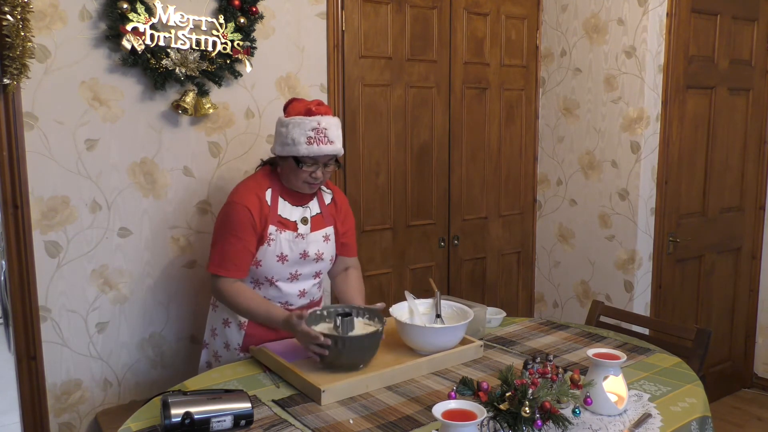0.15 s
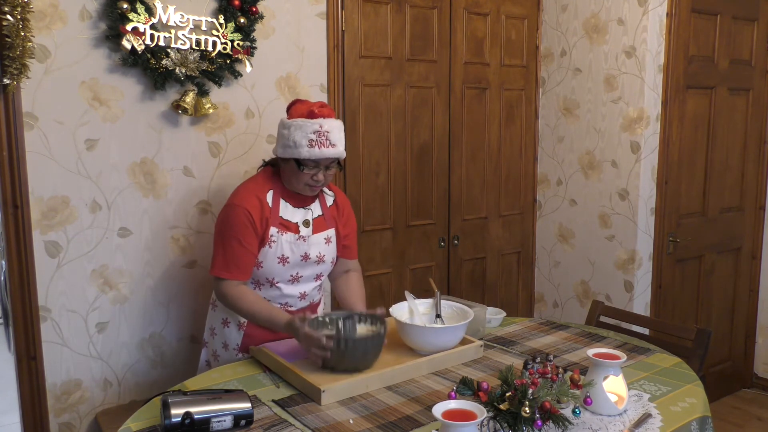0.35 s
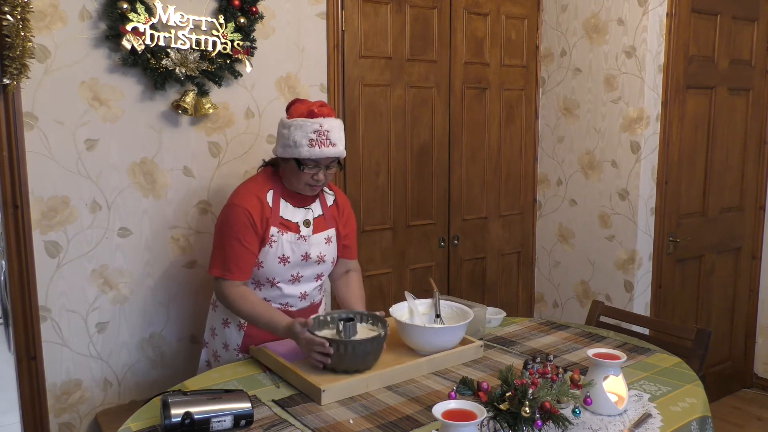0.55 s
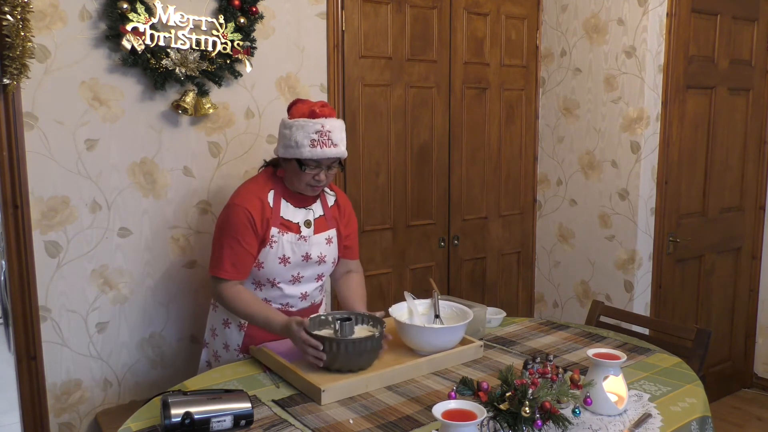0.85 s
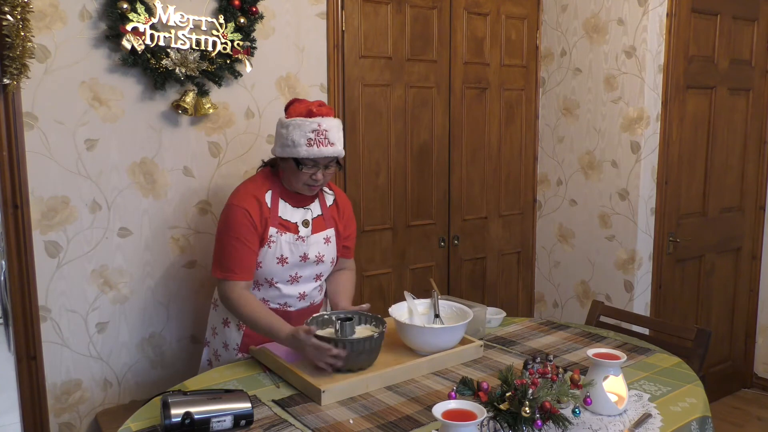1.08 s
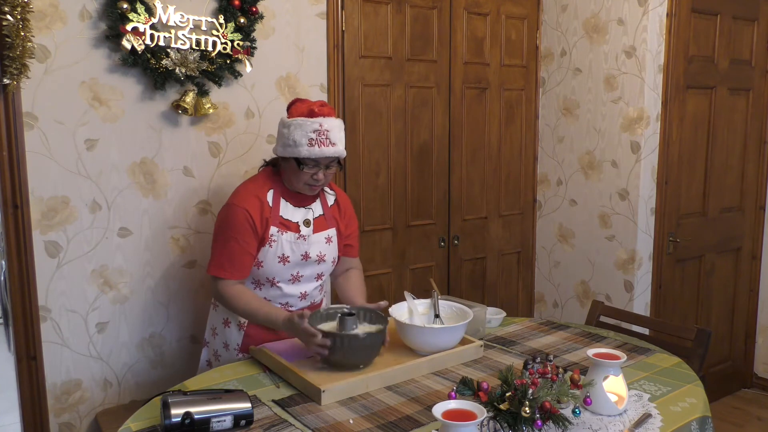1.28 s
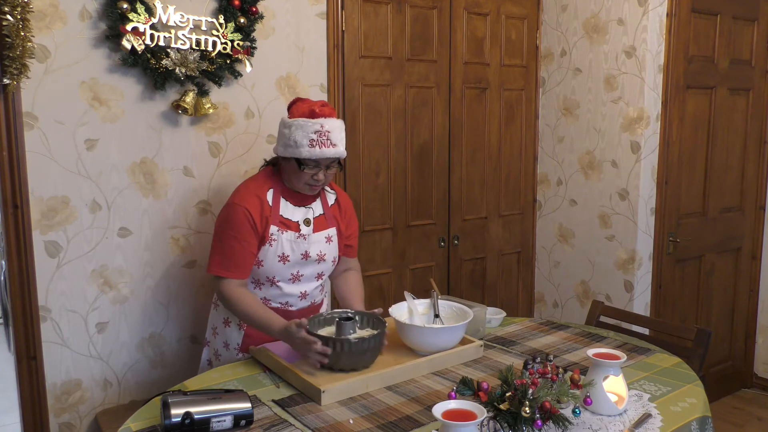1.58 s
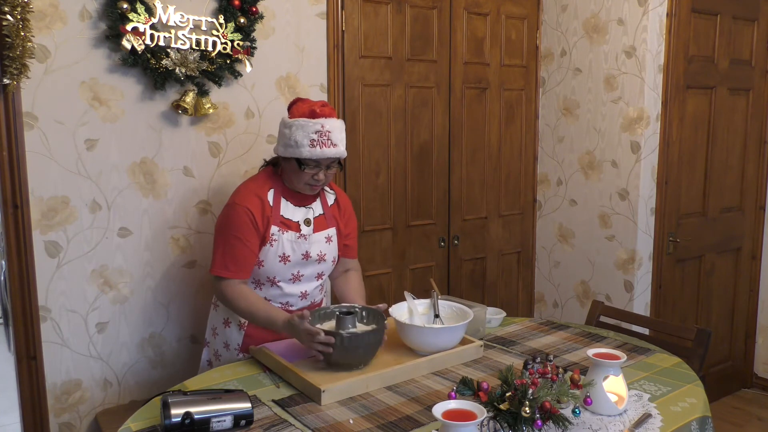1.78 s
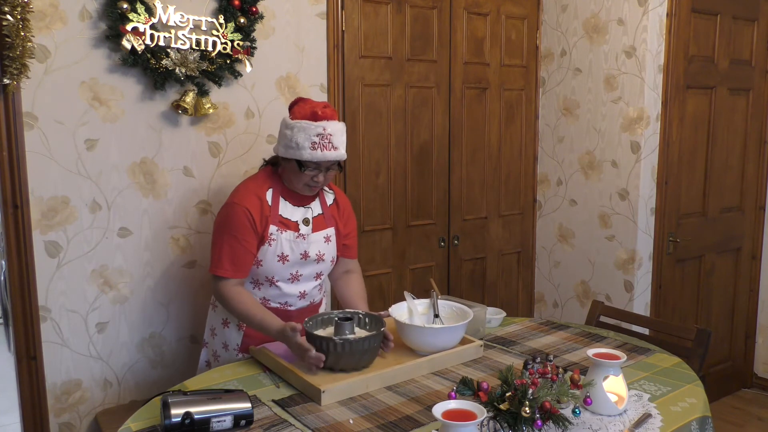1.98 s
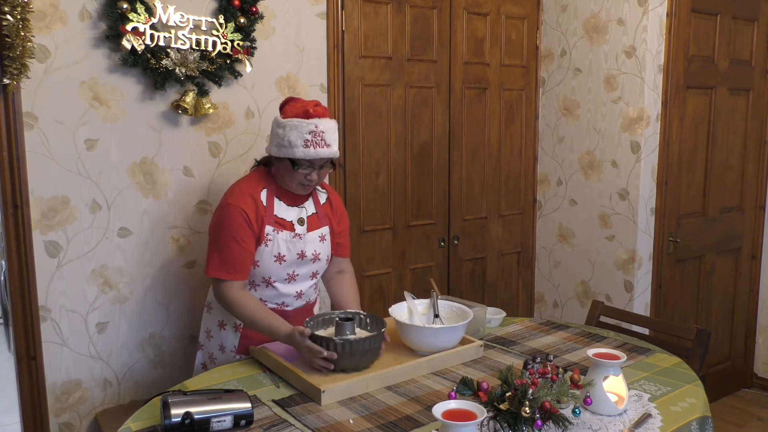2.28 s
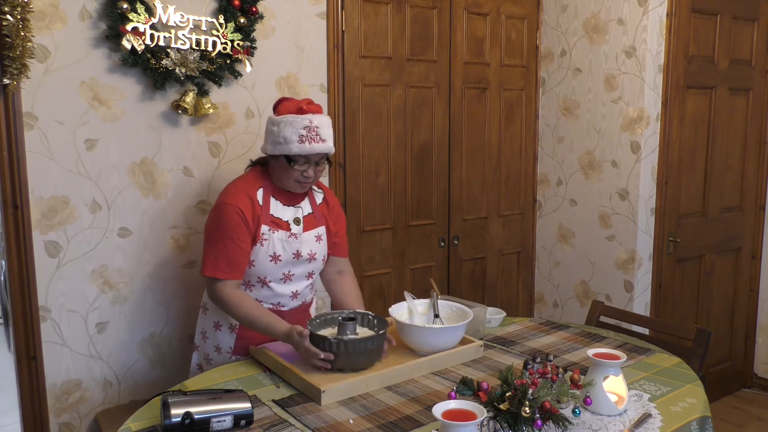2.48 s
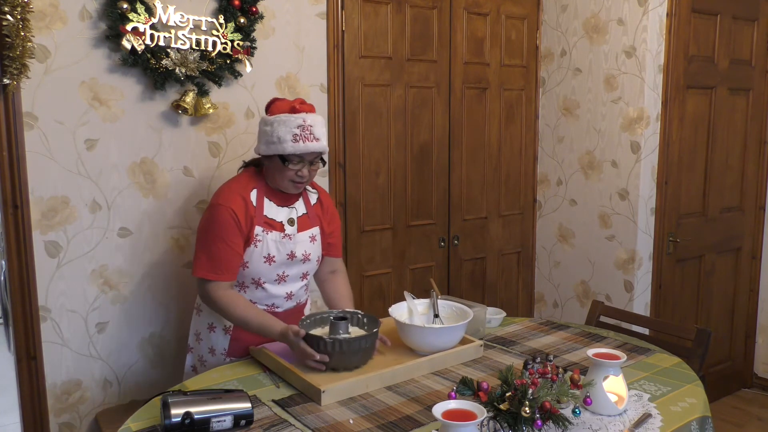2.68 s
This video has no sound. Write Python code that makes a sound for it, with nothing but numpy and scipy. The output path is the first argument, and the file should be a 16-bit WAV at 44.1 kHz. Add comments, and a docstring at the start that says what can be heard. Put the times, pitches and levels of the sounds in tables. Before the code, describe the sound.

Four loud clanking thuds of a filled baking pan on wood, then a gentle set-down

```python
"""A close stereo pair in a small live room: room tone, and hands scuffing on a metal cake pan full of batter.
The pan is knocked down four times on a wooden board, with lighter touches and more scuffs in between.
Each knock is a clank of the rim, a dull thud of board modes and a short wavering ring, under noise reverberation.
Then the pan slides in short strokes of tiny slips and is set down gently, rim first; a last scuff follows.
A limiter flattens each hard knock, then lets the room swell back."""
import sys
import numpy as np
from scipy import signal
from scipy.fft import rfft, irfft
from scipy.io import wavfile
from scipy.ndimage import uniform_filter1d, minimum_filter1d, map_coordinates

SR = 44100
rng = np.random.default_rng(int(sys.argv[2]) if len(sys.argv) > 2 else 0)


def file_out(sig):
    """Save sig as 16-bit WAV at sys.argv[1]."""
    # one column per channel
    cols = np.atleast_2d(sig).T
    # limit, then scale
    lim = np.clip(cols, -1, 1)
    pcm = np.round(lim * 32767).astype(np.int16)
    wavfile.write(sys.argv[1], SR, pcm)


N = 125685

# Pan meets board. Each row: start in seconds, force in dB, hardness in dB per octave (well above a corner),
# pan ring in dB, ring length as a ratio, room in dB, tuning of the thud as a ratio, lower pitch favoured
# by the spot struck in Hz, its lift in dB, upper favoured pitch in Hz, its lift in dB, clank of the rim in Hz.
KNOCKS = [(0.3186, 5.5, 0.6, -1, 1, -1.5, 0.97, 341, 4, 690, 0.5, 2515),
          (0.6913, 8, -0.33, 1, 0.92, -2, 1.028, 421, 1.5, 630, 4.5, 2340),
          (1.051, -29, -7.5, 9, 0.32, -3, 1.0, 197, 17.5, 440, -4, 1490),
          (1.072, -32.5, -16, -12, .6, -4, 0.93, 199, 8, 436, 10.5, 1490),
          (1.095, -34.5, -12.5, 4, .5, -3.5, 1.0, 187, 12, 244, 7, 1500),
          (1.2656, 6.5, 1.5, 2, 0.85, -4, 1.015, 238, 4, 445, 3, 1466),
          (1.587, -31, -11, 5, 0.8, 3.5, 0.89, 445, 7.5, 660, 4, 1550),
          (1.7880, 4, 0.27, 2, 0.88, -3, 0.99, 176, 5, 263, 0, 1544),
          (2.4753, -17.5, -6, -2.5, 0.9, -0.5, 1.03, 178, 7, 720, 5, 900),
          (2.509, -24, -14, 13, 0.27, 4.5, 0.85, 198, 10, 413, 15.5, 1010),
          (2.564, -25.5, -6, -9, .5, 8.5, 1.08, 267, 9, 740, 3, 1390),
          (2.5748, -9.5, -4.5, 2, 0.79, 0.5, 1.087, 177, 5.5, 1060, 9.5, 1250)]
# Lean of the stereo pair. Each row: frequency in Hz, dB added at the left and taken off at the right
# (the direct sound takes half).
LEAN_LEFT = [(30, 2.5), (100, 0.5), (300, 0.5), (700, -0.5), (2000, -0.35), (5000, 0.7), (16000, 0.3)]


def amp(db):
    """Decibels to gain."""
    return 10 ** (np.asarray(db) / 20)


def unit(x):
    """Scales to rms 1."""
    return x / np.sqrt(np.mean(x ** 2) + 1e-20)


def read(points, hz):
    """Reads a table on a log-frequency axis."""
    f, value = np.transpose(points)
    return np.interp(np.log(hz + 1), np.log(f + 1), value)


def add(mix, s, sound):
    """Adds a sound at time s in seconds."""
    part = mix[:, max(round(s * SR), 0):][:, :sound.shape[-1]]
    part += sound[..., :part.shape[1]]


def butter(x, hz, kind, order):
    """A plain low-pass or high-pass."""
    return signal.sosfilt(signal.butter(order, min(hz, SR / 2 - 1), kind, fs=SR, output="sos"), x)


def colour(x, curve, size=4096):
    """Causal minimum-phase filter whose gain in dB is curve(hz)."""
    cepstrum = irfft(np.log(amp(curve(np.fft.rfftfreq(size, 1 / SR)))))
    # folding the cepstrum forward in time makes the filter causal
    cepstrum[1:size // 2] *= 2
    cepstrum[size // 2 + 1:] = 0
    taps = irfft(np.exp(rfft(cepstrum)))[:size // 2]
    return signal.fftconvolve(np.atleast_2d(x), taps[None], axes=1)[:, :x.shape[-1]]


def favour(hz, centre_hz, lift_db):
    """A resonant hump in dB around one pitch."""
    width_octaves = 0.11
    return lift_db * np.exp(-(np.log2((hz + 1) / centre_hz) / width_octaves) ** 2)


def diffuse(spectrum, count):
    """Noise arriving from all sides; how alike the two microphones hear it depends on frequency."""
    # Each row: frequency in Hz, left-right correlation.
    likeness = [(30, 0.51), (70, -0.16), (150, 0.25), (300, 0.33), (550, 0.37), (1000, 0.45), (2500, 0.34),
                (6000, 0.3), (16000, -0.58)]
    hz = np.fft.rfftfreq(count, 1 / SR)
    mid, side = rfft(rng.standard_normal((2, count)))
    same = np.clip(read(likeness, hz), -1, 1)
    lean = read(LEAN_LEFT, hz)
    mid = mid * np.sqrt((1 + same) / 2)
    side = side * np.sqrt((1 - same) / 2)
    pair = np.array([mid + side, mid - side]) * amp([lean, -lean])
    return irfft(pair * amp(read(spectrum, hz)), count)


def room(spectrum):
    """One second of reverberation, each band dying at its own speed after a short build-up."""
    # Each row: frequency in Hz, time to fall 60 dB in seconds.
    room_t60 = [(60, 0.38), (250, 0.41), (700, 0.42), (2000, 0.46), (5000, 0.37), (12000, 0.23)]
    rise_s = 0.0058
    hz, t, bands = signal.stft(diffuse(spectrum, SR), SR, nperseg=256)
    decay = amp(-60 * t / read(room_t60, hz)[:, None])
    tail = signal.istft(bands * decay, SR, nperseg=256)[1][:, :SR]
    return tail * (1 - np.exp(-(np.arange(SR) / SR / rise_s) ** 2))


def with_echo(dry, wet_db):
    """A small sound together with its reverberation."""
    tail = room([(20, 0), (16000, 0)])  # flat spectrum
    wet = signal.fftconvolve(dry, tail / np.linalg.norm(tail[0]), axes=1)[:, :N]
    return dry + amp(wet_db) * wet


def room_tone():
    """The quiet room: steady diffuse noise, strongest in the bass."""
    # Each row: frequency in Hz, relative level in dB.
    floor_colour = [(12, -31), (20, 2), (49, -5), (107, -12), (134, -8.5), (277, -11.5), (624, -23),
                    (1030, -23.5), (1710, -30.5), (8180, -40.5), (16000, -47.5)]
    level_db = -43
    return amp(level_db) * unit(diffuse(floor_colour, N))


def scuffs():
    """Grainy rubbing of hands and pan: noise with a restless level, and its echo."""
    # Each row: start in seconds, rise in seconds, fade time constant in seconds, level in dB.
    rubs = [(.015, 0.019, 0.03, -54), (.08, 0.06, 0.025, -53.5), (0.27, 0.0086, 0.052, -54),
            (0.395, 0.0016, 0.011, -28), (1.039, 0.0084, 0.012, -33), (1.556, 0.018, 0.061, -52),
            (2.12, 0.047, 0.038, -55), (2.2, 0.27, 0.69, -52), (2.731, .01, 0.027, -43),
            (2.79, 0.078, 0.13, -50)]
    # Each row: frequency in Hz, relative level in dB.
    rub_colour = [(200, -50), (1200, -4), (2300, 2.5), (4500, 2), (7500, -4.5), (10000, -14), (16000, -37)]
    grain_db, wet_db = 2.3, -4
    t, level = np.arange(N) / SR, np.zeros(N)
    for s, rise, fade, db in rubs:
        swell = np.clip((t - s) / rise, 0, 1)
        level += amp(db) * swell * np.exp(-np.maximum(t - s - rise, 0) / fade)
    wander = unit(uniform_filter1d(rng.standard_normal(N), size=90))
    grain = unit(amp(grain_db * wander))
    dry = level * grain * unit(diffuse(rub_colour, N))
    return with_echo(dry, wet_db)


def mode(hz, db, t60, t, phase=0):
    """One dying vibration."""
    return amp(db) * np.exp(-np.log(1000) * t / t60) * np.sin(2 * np.pi * hz * t + phase)


def rim_chatter(t):
    """The rim chatters on the wood: a short coloured burst of noise."""
    # Each row: frequency in Hz, gain in dB.
    chatter_colour = [(30, -19.5), (200, 16), (1500, 8.5), (2600, -8), (2950, 3), (3400, 0.5),
                      (4500, -11.5), (6000, -13), (9000, -26.5), (16000, -23)]
    level_db, rise_s, fade_s = -1.5, 0.0016, 0.0035
    chatter = rng.standard_normal(len(t)) * np.exp(-t / fade_s) * (1 - np.exp(-t / rise_s))
    return amp(level_db) * colour(chatter, lambda hz: read(chatter_colour, hz))[0]


def board(tuning, t):
    """Board and table under the loaded pan: low modes start with the push, high ones depend on the spot struck."""
    # Each row: frequency in Hz before tuning, level in dB, time to fall 60 dB in seconds.
    board_modes = [(129, -12.5, 0.0056), (188, -12, 0.066), (236.6, -7.5, 0.11), (355.5, 2.5, 0.028),
                   (435, -7, 0.04), (654.3, -2, 0.049), (754.6, -7.5, 0.078), (1006, -16, 0.059),
                   (1263, -7.5, 0.022), (1426, -5.5, 0.015), (1950, -8.5, 0.014), (2340, -7.5, 0.014),
                   (3310, -28.5, 0.031), (4414, -19, 0.024), (5340, -15.5, 0.0062)]
    scatter_hz = 1354  # starting phases grow random toward this pitch and beyond
    return sum(mode(hz * tuning, db, t60, t, rng.standard_normal() * (hz / scatter_hz) ** 2)
               for hz, db, t60 in board_modes)


def pan_ring(ring_db, ring_length, t, count=64):
    """The sloshing batter makes each mode waver in level and pitch, so the ring dies unevenly."""
    # Pan and what it stands on. Each row: frequency in Hz before a slight random detuning,
    # level in dB before ring_db, time to fall 60 dB in seconds before ring_length.
    ring_modes = [(181.3, -17, 0.4), (220.5, -21.5, 0.49), (255.2, -19, 0.53), (363.6, -21.5, 0.42),
                  (440.5, -18, 0.47), (429, -15, 0.31), (572, -28.5, 0.4), (652, -22.5, 0.69),
                  (712, -15.5, 0.39), (761, -20.5, 0.38), (826, -24.5, 0.53), (942, -28.5, 0.56),
                  (1190, -24.5, 0.31), (1337, -35.5, 0.51), (1955, -34.5, 0.49)]
    rise_s, detune_ratio = 0.0027, 0.0025
    slosh_hz, slosh_depth = 21.2, 0.47  # how fast and how deeply the batter unsettles the ring
    out = np.zeros((2, len(t)))
    for hz, db, t60 in ring_modes:
        knots = rng.standard_normal(count) + 1j * rng.standard_normal(count)
        waver = 1 + slosh_depth * np.interp(t * slosh_hz, np.arange(count), knots)
        # each microphone hears the mode at a slightly different phase
        phase = rng.uniform(0, 2 * np.pi) + 0.35 * rng.standard_normal((2, 1)) + np.angle(waver)
        pitch_hz = hz * (1 + detune_ratio * rng.standard_normal())
        out += abs(waver) * mode(pitch_hz, db + ring_db, t60 * ring_length, t, phase)
    return out * (1 - np.exp(-t / rise_s))


def ears(x):
    """The sound reaches the left microphone a moment early, and with a little more bass."""
    lead_s = 0.000035
    late = map_coordinates(x, [np.arange(len(x)) - lead_s * SR], order=3)
    left = colour(x, lambda hz: read(LEAN_LEFT, hz) / 2)
    right = colour(late, lambda hz: -read(LEAN_LEFT, hz) / 2)
    return np.vstack([left, right])


def knock(force_db, hardness_db, ring_db, ring_length, room_db, tuning, low_hz, low_db, high_hz, high_db, clank_hz):
    """The rim chatters and clanks on the wood, the board thuds, the pan rings and the room answers."""
    # First reflections at each microphone. Each row: delay in seconds, gain as a ratio.
    echoes_left = [(.0032, 0.15), (.0077, 0.22), (.0152, .15), (.0275, .14)]
    echoes_right = [(.0032, .2), (.0077, .42), (0.0159, .1), (0.0212, .1)]
    # The knock as the room returns it. Each row: frequency in Hz, relative level in dB.
    tail_colour = [(30, -16), (110, -2), (180, -1), (260, 6.5), (305, -2), (400, 3), (520, 1), (700, 4.5),
                   (1000, -3.5), (1500, -12.5), (2400, -19.5), (3000, -25), (4400, -25.5), (6300, -39.5),
                   (9000, -51.5), (16000, -100)]
    thud_db, tail_db, clank_db, clank_t60_s, strike_s = 1.5, 7.5, -5, 0.016, 0.00056
    contact_hz, radiate_hz, wall_hz, hard_hz = 5700, 113, 4500, 610
    t = np.arange(SR) / SR
    early = t[:SR // 5]
    click = rim_chatter(early)
    thud = amp(thud_db) * board(tuning, early) + mode(clank_hz, clank_db, clank_t60_s, early)
    thud = butter(thud * (1 - np.exp(-early / strike_s)), contact_hz, "low", order=4)
    direct = butter(click + thud, radiate_hz, "high", order=2)
    bounced = butter(direct, wall_hz, "low", order=2)  # the walls return less treble
    out = amp(tail_db + room_db) * room(tail_colour)
    add(out, 0, pan_ring(ring_db, ring_length, t[:SR // 2]))
    add(out, 0, ears(direct))
    for ear, echoes in enumerate([echoes_left, echoes_right]):
        for delay, gain in echoes:
            add(out[ear:ear + 1], delay, gain * bounced)

    def blow_colour(hz):
        """Hardness tilts the treble; the spot struck favours two pitches."""
        tilt = hardness_db * np.log2(1 + (hz / hard_hz) ** 2) / 2
        return tilt + favour(hz, low_hz, low_db) + favour(hz, high_hz, high_db)

    return amp(force_db) * colour(out, blow_colour)


def table_shake():
    """A low rumble swells and dies after each knock."""
    level_db, rumble_hz, peak_s = -45, 34.2, 0.12
    t, shake = np.arange(N) / SR, np.zeros(N)
    for s, force_db, *_ in KNOCKS:
        u = np.maximum(t - s, 0) / peak_s
        shake += amp(force_db) * u * np.exp(1 - u)
    rumble = unit(diffuse([(10, -12), (rumble_hz, 0), (90, -11), (300, -50), (2000, -100)], N))
    return amp(level_db) * shake * rumble


def slide():
    """The pan is shifted in short strokes; each is a run of tiny slips that sounds one of its resonances."""
    # Each row: middle in seconds, half length in seconds, level at the middle in dB, pitch in Hz.
    strokes = [(2.201, .025, -48.5, 765), (2.254, .04, -51, 432), (2.273, 0.033, -48, 733),
               (2.335, 0.024, -40, 713), (2.374, 0.026, -53, 696), (2.445, .025, -46.5, 673)]
    # Each row: frequency in Hz, gain in dB.
    stroke_colour = [(60, -6), (200, -7), (520, 2.5), (900, -5.5), (2000, -14.5), (8000, -39)]
    slips_per_s, lift_db, wet_db = 260, 15.5, 0.5
    t, dry = np.arange(SR // 5) / SR, np.zeros((2, N))
    middle = t.mean()
    for s, length, db, pitch_hz in strokes:
        slips = rng.standard_normal(len(t)) * (rng.random(len(t)) < slips_per_s / SR)
        rub = unit(colour(slips, lambda hz: read(stroke_colour, hz) + favour(hz, pitch_hz, lift_db)))
        add(dry, s - middle, amp(db) * rub * np.exp(-((t - middle) / length) ** 2))
    return with_echo(dry, wet_db)


def scene():
    """Knocks and handling over the quiet room."""
    mix = room_tone() + scuffs() + table_shake() + slide()
    for s, *blow in KNOCKS:
        add(mix, s, knock(*blow))
    return mix


def record(dry):
    """A limiter clamps fast, holds and recovers; the first peaks saturate; then the band limit."""
    limit_db, attack_s, hold_s, recover_db_per_s = 0, 0.00013, 0.061, 127.5
    knee, cut_hz = 13, 16400  # a high knee exponent bends only the peaks near full scale
    over = np.maximum(20 * np.log10(abs(dry).max(0) + 1e-9) - limit_db, 0)
    # hold the largest recent overshoot, then let it fall at a steady rate
    hold = int(hold_s * SR) // 2
    held = -minimum_filter1d(-over, 2 * hold + 1, origin=hold)
    fall = np.arange(N) / SR * recover_db_per_s
    recovering = np.maximum.accumulate(held + fall) - fall
    r = np.exp(-1 / (attack_s * SR))
    duck_db = signal.lfilter([1 - r], [1, -r], recovering)
    out = dry * amp(-duck_db)
    out = out / (1 + abs(out) ** knee) ** (1 / knee)
    low_pass = signal.firwin(255, cut_hz, window=("kaiser", 9), fs=SR)
    return signal.oaconvolve(out, low_pass[None], "same")


dry = scene()
out = record(dry)
file_out(out)
```